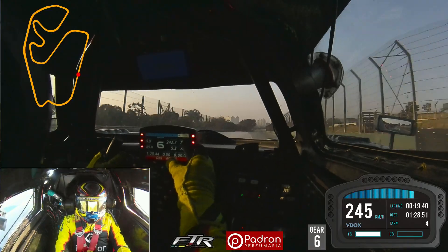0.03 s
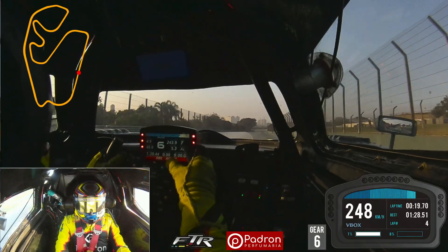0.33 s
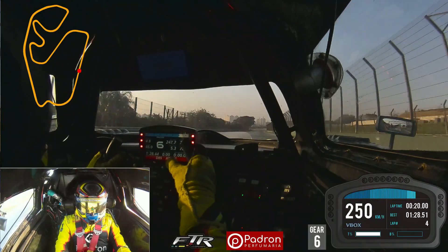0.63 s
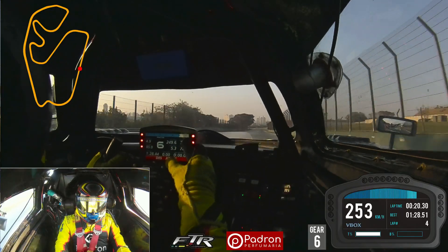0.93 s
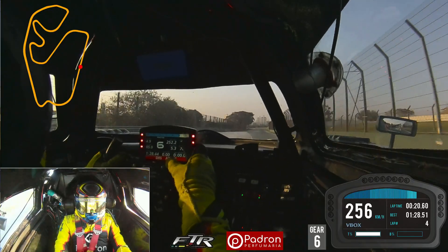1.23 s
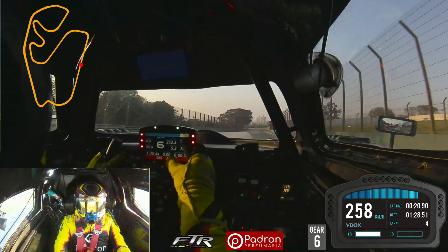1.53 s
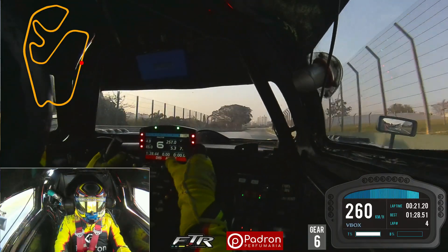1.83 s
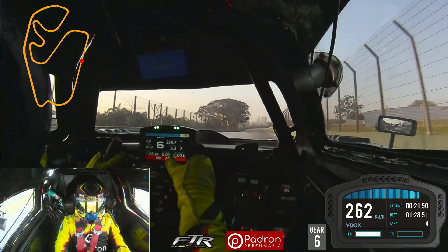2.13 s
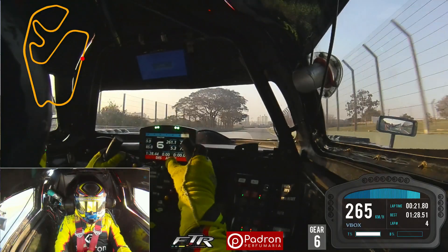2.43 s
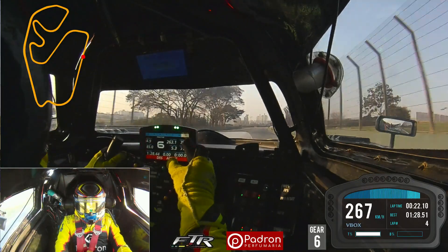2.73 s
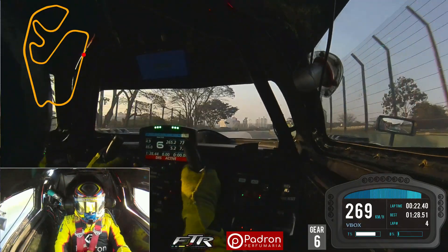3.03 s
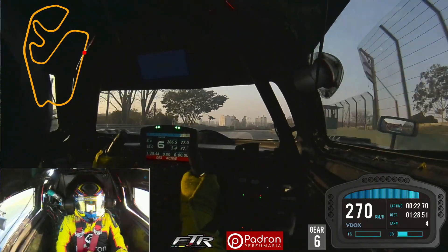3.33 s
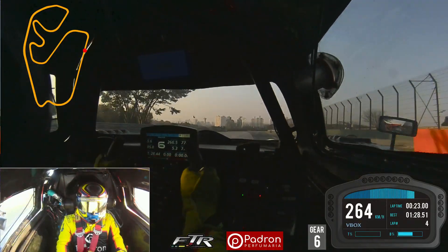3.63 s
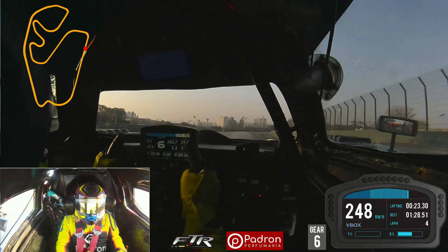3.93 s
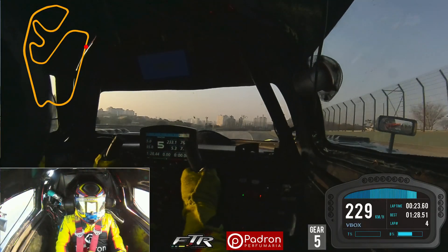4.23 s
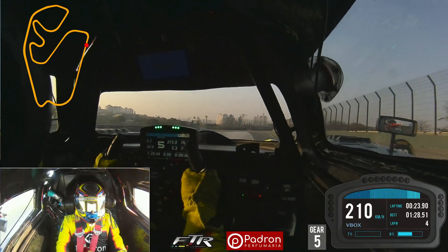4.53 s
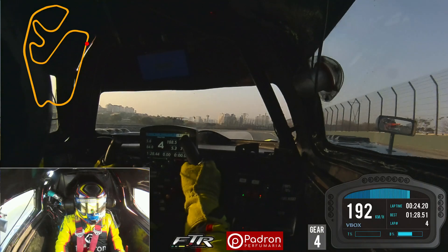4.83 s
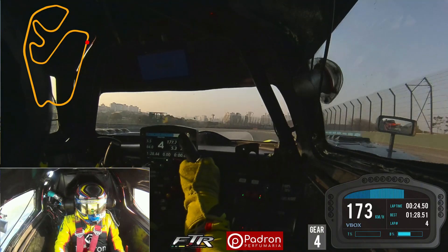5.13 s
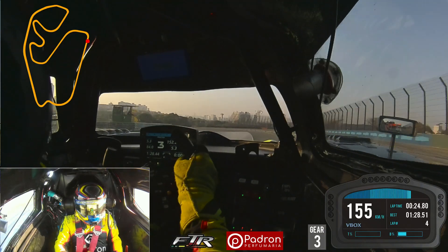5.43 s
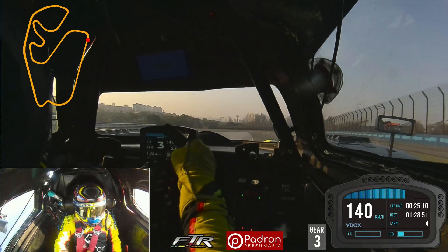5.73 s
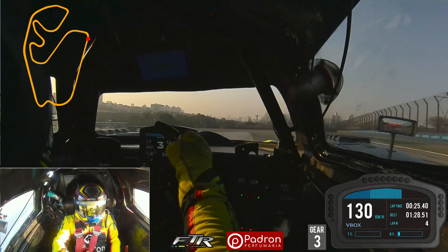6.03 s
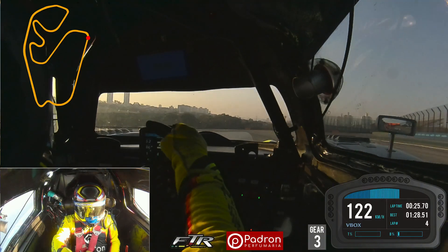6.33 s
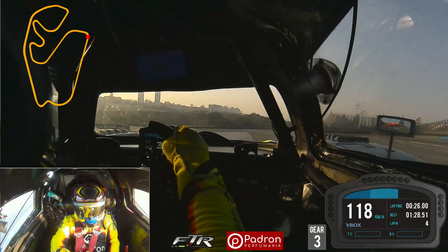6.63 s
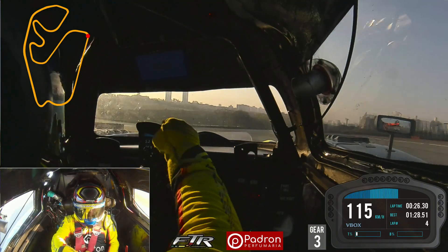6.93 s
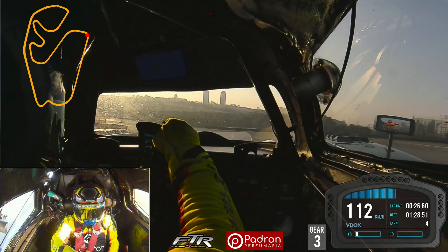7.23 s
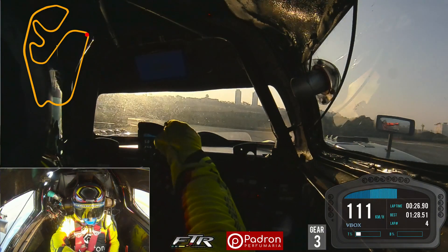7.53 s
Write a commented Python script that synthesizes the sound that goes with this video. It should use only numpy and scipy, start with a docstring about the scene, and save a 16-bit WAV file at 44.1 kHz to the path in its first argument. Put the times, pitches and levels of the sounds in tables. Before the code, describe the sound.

A race car's V8 engine booms and rasps at full throttle, its pitch creeping upward over road rumble, hiss and small rattles. About three seconds in, the throttle lifts and the brakes give a brief, wavering groan. The revs fall through three downshifts, each with a sharp blip, then the engine burbles low with a faint whine and swells once more at the end. It is all heard close, inside the bare cockpit.

```python
"""Inside the bare cockpit of a V8 race car: flat out in top gear, hard on the brakes with three blipped
downshifts, then a long burbling overrun into the corner and one last swell. Exhaust orders boom, their
overtones sweep through cabin resonances, and gas turbulence rasps and hisses with the firings, over road
rumble and small rattles. A groan joins the hardest braking, two high engine orders whine on the
overrun, and grit ticks once."""
import sys
import numpy as np
from scipy import signal
from scipy.fft import rfft, irfft
from scipy.io import wavfile
from scipy.ndimage import uniform_filter1d, minimum_filter1d

SR = 44100
rng = np.random.default_rng(int(sys.argv[2]) if len(sys.argv) > 2 else 0)


def materialize(psi):
    """Save the field psi as 16-bit PCM at rate SR to the path in sys.argv[1].

    A 1-D psi becomes a single channel; in a 2-D psi each row is a channel.
    """
    bounded = np.clip(np.atleast_2d(psi).T, -1, 1)
    quanta = np.round(bounded * 32767).astype(np.int16)
    wavfile.write(sys.argv[1], SR, quanta)


N = 334278
T = np.arange(N) / SR
HZ = np.fft.rfftfreq(N, 1 / SR)
BLIP_RISE_S, BLIP_FALL_S = 0.05, 0.05
BOOM_ORDERS = 18


def amp(db):
    """Decibels to gain."""
    return 10 ** (np.asarray(db) / 20)


def unit_rms(x):
    """Scales to rms 1."""
    return x / np.sqrt(np.mean(x ** 2) + 1e-20)


def curves(rows):
    """One automation curve for each column after the time."""
    times, *columns = np.transpose(rows)
    return [np.interp(T, times, column) for column in columns]


def swell(start, rise, hold, fall):
    """A linear attack, hold and release, 0 to 1 and back; times in seconds."""
    return np.clip(np.minimum((T - start) / rise, 1 - (T - start - rise - hold) / fall), 0, 1)


def wander(rate_hz):
    """A random drift of rms 1 that turns about rate_hz times a second."""
    knots = rng.standard_normal(4096)
    return unit_rms(np.interp(T * rate_hz, np.arange(len(knots)), knots))


def eq_curve(points):
    """An EQ curve in dB, drawn through points on a log-frequency axis."""
    hz, db = np.transpose(points)
    return np.interp(np.log(HZ + 1), np.log(hz + 1), db)


def bells(resonances):
    """An EQ curve in dB with one bell for each resonance."""
    return sum(db / (1 + (2 * (HZ - hz) / width) ** 2) for hz, width, db in resonances)


def coloured(x, points, extra_db=0):
    """Applies an EQ of (Hz, dB) points, then scales to rms 1."""
    return unit_rms(irfft(rfft(x) * amp(eq_curve(points) + extra_db), N))


# Road speed. Each row: time in seconds, four-stroke cycles a second that it would give in top gear.
ROAD_SPEED = [(0.0, 48.23), (0.9, 50.02), (1.3, 50.39), (1.65, 50.9), (2.4, 51.96), (3.1, 52.83),
              (3.5, 50.38), (3.8, 47.06), (4.22, 43.77), (4.8, 36.98), (5.2, 32.83), (5.77, 27.68),
              (6.12, 26.11), (6.55, 24.91), (6.96, 24.28), (7.04, 24.69), (7.3, 24.02), (7.58, 24.05)]
# Blipped downshifts. Each row: start in seconds, hold in seconds, peak cycles a second,
# the new gear's ratio to top gear, then the lift of boom, rasp and hiss in dB.
DOWNSHIFTS = [(4.034, 0.03, 52.93, 1.13, 6, 5, 1.5), (4.48, 0.0948, 52.68, 1.28, 5, 9.5, 6.5),
              (5.205, 0.0603, 50.85, 1.5, 6.5, 11, 4.5)]
def engine_speed():
    """Engine cycles a second: road speed times the gear, the revs flaring as each lower gear goes in."""
    gear = np.ones(N)
    for start, hold, _, ratio, *_ in DOWNSHIFTS:
        gear[T > start + BLIP_RISE_S + hold / 2] = ratio
    hz = curves(ROAD_SPEED)[0] * gear
    for start, hold, peak_hz, *_ in DOWNSHIFTS:
        hz += (peak_hz - hz) * swell(start, BLIP_RISE_S + hold / 2, hold / 2, BLIP_FALL_S)
    return hz


# How hard the car works. Each row: time in seconds, then the boom, rasp and hiss faders in dB.
EFFORT = [(0.0, -13.5, -21.5, -35.5), (1.2, -15.5, -23.5, -35.5), (1.6, -14, -24.5, -35),
          (3.0, -16, -23.5, -35.3), (3.33, -14.5, -23.5, -34.3), (3.45, -13, -21, -32),
          (4.0, -19.5, -24, -36.5), (4.2, -17.5, -27.5, -39), (4.38, -16.5, -28, -41.5),
          (4.8, -16, -28.5, -41), (5.17, -16.5, -31.5, -41), (5.42, -19.5, -32.3, -45.5),
          (5.63, -20, -35, -45.5), (6.35, -15.5, -30.5, -45), (7.05, -15, -30.5, -45.5),
          (7.32, -17.8, -33.5, -45.5)]
# Brief swells. Each row: start, hold and fall in seconds, then the lift of boom, rasp and hiss in dB.
SURGES = [(1.24, 0.03, 0.47, 2, 2.5, 4), (3.08, 0.02, 0.093, 3, 4.5, 5), (5.684, 0.038, 0.54, 6, 9, 6.5),
          (5.98, 0.24, 0.07, 1, 1.5, 2), (6.624, 0.034, 0.21, 2, 1.5, 2), (7.375, 0.15, 0.1, 5, 3, 1)]
def effort(surge_rise_s=0.041):
    """The boom, rasp and hiss faders in dB: a slow ride, pushed up by each blip and surge."""
    faders_db = np.array(curves(EFFORT))
    for start, hold, _, _, *lift_db in DOWNSHIFTS:
        faders_db += np.outer(lift_db, swell(start, BLIP_RISE_S, hold, BLIP_FALL_S))
    for start, hold, fall, *lift_db in SURGES:
        faders_db += np.outer(lift_db, swell(start, surge_rise_s, hold, fall))
    return faders_db


# The cue sheet. Each row: start in seconds, order balance, trims in dB for exhaust, rumble,
# overtones and rasp, throttle from 0 to 1, stumble from 0 to 1.
CUES = [ (0, "pull", -0.6, -6.5, -1.8, -5.5, 1, 0.07), (1.27, "surge", 0.6, -6.5, -2.5, -4, 1, 0.21),
        (2.08, "top", 0.5, -5.5, -2.5, -4.5, 1, 0.06), (3.1, "top", -1.5, -4, -11, 0, 0.57, 0.46),
        (3.28, "brake", -2.5, -3.5, -8.5, -0.4, 0.5, 0.33), (4.1, "drag", -2, -4.3, -4.5, 0, 0.2, 0.24),
        (4.98, "overrun", -1.5, -4.5, -6.5, 3, 0.05, 0.23), (5.3, "overrun", -3, -2.5, -7, 2.2, 0.02, 0.43),
        (5.7, "overrun", -1, -6.5, -9, -0.8, 0.1, 0.14), (6.42, "coast", -0.2, -7.5, -10, 0.2, 0.07, 0.13),
        (6.99, "feather", -0.5, -8.5, -7, 3, 0, 0.15), ]
# The cue during a blip: the same columns without the start.
BLIP_CUE = ("blip", -0.8, -6.5, -7.5, -1.84, 0.2, 0.14)
def follow_cues(values, blip_value, glide_s=0.028):
    """Glides from one cue's value to the next, crossfading to blip_value during each blip."""
    starts = np.searchsorted(T, [cue[0] for cue in CUES[1:]])
    steps = np.repeat(np.asarray(values, float), np.diff([0, *starts, N]))
    blip = sum(swell(start, BLIP_RISE_S, hold, BLIP_FALL_S) for start, hold, *_ in DOWNSHIFTS)
    return (1 - blip) * uniform_filter1d(steps, int(glide_s * SR)) + blip * blip_value


# Engine-order balance heard in the cabin. Each row: a label, then cycle orders 1 to 18 in relative dB.
# The first three are one flat-out run, the cabin favouring different orders as the revs climb.
ORDER_BALANCES = { "pull": [-54, -19.5, -23.5, -35, -34, -24.5, -38, -23, -41, -54, -36, -42, -37.5, -35.5,
                  -53, -36, -61, -38.5], "surge": [-46, -18, -21.5, -39, -23.5, -24.5, -59, -22.5, -35.5,
                  -40, -33.5, -46, -32, -32.5, -38, -56, -37, -40], "top": [-35, -18.5, -24.5, -35, -22,
                  -26, -35, -23.5, -34.5, -35.5, -33.5, -40, -36.5, -32.5, -38, -41, -35.5, -54], "brake":
                  [-52, -27.5, -24, -30.5, -33, -33, -47, -30.5, -40.5, -54, -55, -41, -48, -60, -52, -45,
                  -67, -42], "drag": [-42, -21, -24, -31.5, -29.5, -31, -42, -34.5, -36, -48, -48, -41,
                  -42.5, -50.5, -50, -42, -50, -46], "blip": [-37, -16, -46, -39, -25, -26, -37, -21, -53,
                  -30.5, -28, -51, -43, -32.5, -44, -43, -49, -32.5], "overrun": [-35, -24, -19, -21.5, -31,
                  -20, -30, -29, -31, -41, -31.5, -47, -39, -38.5, -44, -55, -42, -45], "coast": [-46, -21,
                  -22.5, -24.5, -28, -22, -32, -28, -36, -48, -34, -60, -57, -42.5, -39, -62, -52, -51],
                  "feather": [-44, -22, -28.5, -29.5, -25.5, -34, -55, -19.5, -38, -42, -35.5, -34, -42,
                  -46, -41, -53, -59, -49], }
def exhaust(cycles, stumble):
    """The boom of an uneven firing pattern, eight firings a cycle; each low order stumbles on its own."""
    shares = {label: amp(db) / np.linalg.norm(amp(db)) for label, db in ORDER_BALANCES.items()}
    boom = np.zeros(N)
    for k in range(BOOM_ORDERS):
        level = follow_cues([shares[cue[1]][k] for cue in CUES], shares[BLIP_CUE[0]][k])
        smear = 0.05 * k * rng.standard_normal()  # the pipe scatters the higher orders' phases
        phase = 2 * np.pi * ((k + 1) * cycles + smear)
        tone = (1 + stumble * wander(30)) * np.cos(phase)
        burble = stumble * wander(30) * np.sin(phase)
        boom += level * (tone + burble)
    return boom * np.sqrt(2 / (1 + 2 * stumble ** 2))


# Narrow cabin resonances. Each row: centre in Hz, width in Hz, boost in dB.
CABIN_RESONANCES = [(1019, 73, 10), (1100, 33, 8), (1187, 33, 9.5), (1315, 84, 12.5), (1450, 29, 11),
                    (1508, 23, 10.5), (1594, 60, 12.5), (1674, 20, 11), (1763, 38, 12), (1946, 36, 9),
                    (2043, 50, 8), (2240, 37, 9), (2390, 37, 9), (2670, 45, 12), (2910, 59, 11)]
def overtones(cycles, count=84, size=4096):
    """High engine orders that swell and fade as they sweep through the cabin's resonances."""
    above_boom = np.arange(count) > BOOM_ORDERS
    wavetable = irfft(np.exp(2j * np.pi * rng.random(count)) * above_boom, size)
    jitter = 0.0007 * wander(60)
    buzz = np.interp((cycles + jitter) % 1, np.arange(size) / size, wavetable)
    tilt = [(700, 19), (950, 0.5), (1300, -3), (1700, -5.5), (2100, -5.5), (2900, -12.5),
            (3600, -16.5), (4400, -29)]
    return coloured(buzz, tilt, bells(CABIN_RESONANCES))


# Thin panels that ring with the hiss and rattles. Each row: centre in Hz, width in Hz, boost in dB.
PANELS = [(2950, 230, 3.5), (5600, 300, 0.5), (6600, 86, -0.5), (8900, 600, 2)]
def shell_ring(ripple_db=2.0, spacing_hz=55, count=2048):
    """The bare shell as an EQ curve in dB: panel peaks over a ripple of dense small resonances."""
    ripple = np.interp(HZ / spacing_hz, np.arange(count), rng.standard_normal(count))
    return bells(PANELS) + ripple_db * ripple


# Midrange rasp and high hiss, throttle open and shut. Each row: frequency in Hz, EQ gain in dB.
RASP_OPEN = [(300, -35), (480, 2.5), (700, 1), (880, -0.5), (1050, 3), (1210, -2.5), (1350, 3.5),
             (1650, -0.5), (1950, -3), (2300, -10), (2600, -10.5), (3200, -30)]
RASP_SHUT = [(300, 8), (450, 0.5), (600, 4.5), (800, -1.5), (900, -3), (1050, 1), (1200, -11.5),
             (1400, -1.5), (1650, -8.5), (1950, -10), (2500, -23), (3200, -44)]
HISS_OPEN = [(1400, -37), (2400, -9.5), (2700, -2), (2950, -4), (3250, -5), (3800, -5.5), (5000, -11),
             (6100, -13), (8000, -19), (9000, -19), (12000, -24), (14000, -31), (15700, -36)]
HISS_SHUT = [(1400, -18), (2400, -1.5), (2800, -2), (3400, -0.5), (3900, -2.5), (4800, -8.5), (5700, -7.5),
             (6700, -10), (7800, -16), (9000, -14.5), (11000, -18.5), (13500, -39), (15700, -29)]
def turbulence(cycles, throttle, open_eq, shut_eq, pulsing, extra_db=0):
    """Gas noise that puffs with the firings; the throttle crossfades between its two colours."""
    beat = sum(depth * np.cos(2 * np.pi * (order * cycles + rng.random()))
               for order, depth in enumerate([0.11, 0.78, 0.78, 0.85], 1))
    puffs = np.exp(pulsing * beat) * rng.standard_normal(N)
    on_throttle = throttle * coloured(puffs, open_eq, extra_db)
    off_throttle = (1 - throttle) * coloured(puffs, shut_eq, extra_db)
    return unit_rms(on_throttle + off_throttle)


# Rumble at speed and when slow. Each row: frequency in Hz, EQ gain in dB.
RUMBLE_FAST = [(12, -16), (25, 1), (45, 1.5), (80, 0), (120, -4.5), (180, 1), (240, -6), (320, -6),
               (420, -11), (520, -13), (800, -50)]
RUMBLE_SLOW = [(12, -8), (25, -1.5), (45, 3), (80, 4), (120, -3), (180, -6.5), (240, -7.5), (320, -8.5),
               (420, -9), (520, -17.5), (800, -47)]
# The crossfade between them. Each row: time in seconds, share of the slow rumble from 0 to 1.
SLOWING = [(3.7, 0), (4.6, 0.94)]
def road_rumble():
    """Road and wind shake the shell, deeper as the car slows."""
    slow = curves(SLOWING)[0]
    shake = rng.standard_normal(N)
    return (1 - slow) * coloured(shake, RUMBLE_FAST) + slow * coloured(shake, RUMBLE_SLOW)


def rattles(shell_db, per_s=90, spread_db=7.0, decay_s=0.0028):
    """Grit and loose fittings hit the shell at random, each a tiny burst of bright noise."""
    hits = rng.random(N) < per_s / SR
    strength = amp(spread_db * np.minimum(rng.exponential(1, N), 2))
    envelope = signal.lfilter([1], [1, -np.exp(-1 / (decay_s * SR))], hits * strength)
    bright = [(1200, -25), (2500, 6), (5000, -1), (9000, -2), (13000, -10), (16000, -18)]
    return coloured(envelope * rng.standard_normal(N), bright, shell_db)


# The groan's pitch line. Each row: time in seconds, unsounded fundamental in Hz.
GROAN_PITCH = [(3.4, 142.7), (3.66, 157.5), (3.77, 152.3), (3.83, 158), (3.94, 151), (4.12, 150.5),
               (4.4, 141)]
# Its chord. Each row: harmonic number, relative level in dB.
GROAN_PARTIALS = [(3, -9), (4, -0.5), (5, -8.5), (6, -7), (7, -7.5), (9, -11)]
def braking_groan(waver=0.01091, gain_db=-28.5):
    """A rough, wavering chord while the brakes bite hardest."""
    hz = curves(GROAN_PITCH)[0] * (1 + waver * wander(90))
    phase = 2 * np.pi * np.cumsum(hz) / SR
    chord = np.zeros(N)
    for harmonic, db in GROAN_PARTIALS:
        judder = 1 + 0.3 * wander(140)
        chord += amp(db) * judder * np.sin(harmonic * phase + 2 * np.pi * rng.random())
    return amp(gain_db) * swell(start=3.384, rise=0.22, hold=0.52, fall=0.29) * np.sqrt(2) * chord


# Two engine orders that sing out. Each row: cycle order, start and end in seconds, level in dB.
HIGH_ORDER_WHINES = [(38, 5.656, 6.61, -42.5), (42, 6.415, 7.3, -49)]
def high_order_whine(cycles, flutter=0.44):
    """A thin, fluttering whine on the overrun, as high engine orders pass a resonance near 1.5 kHz."""
    whine = np.zeros(N)
    for order, start, end, db in HIGH_ORDER_WHINES:
        arch = np.sqrt(np.sin(np.pi * np.clip((T - start) / (end - start), 0, 1)))
        tone = np.sqrt(2) * np.sin(2 * np.pi * order * cycles)
        whine += amp(db) * arch * (1 + flutter * wander(30)) * tone
    return whine


# The tick's bright colour. Each row: frequency in Hz, EQ gain in dB.
TICK_EQ = [(1500, -20), (3000, 3), (5000, -10), (6800, 2), (8000, -9), (10000, -2), (11300, -4), (12800, 6),
           (15000, -12.5)]
def grit_tick(start_s=7.519, level_db=-24, t60_s=0.036):
    """One sharp tick, as of grit on the body: a noise burst that dies at once."""
    envelope = (T >= start_s) * amp(level_db - 60 * np.maximum(T - start_s, 0) / t60_s)
    return envelope * coloured(rng.standard_normal(N), TICK_EQ)


def scene():
    """The mono cockpit mix: revs set the pitch, the faders and the cues set the balance."""
    cycles = np.cumsum(engine_speed()) / SR
    boom_db, rasp_db, hiss_db = effort()
    cue_columns = list(zip(*CUES))[2:]
    automation = map(follow_cues, cue_columns, BLIP_CUE[1:])
    exhaust_trim, rumble_trim, overtone_trim, rasp_trim, throttle, stumble = automation
    shell_db = shell_ring()
    boom = amp(boom_db + exhaust_trim) * exhaust(cycles, stumble)
    buzz = amp(rasp_db + overtone_trim) * overtones(cycles)
    rasp = turbulence(cycles, throttle, RASP_OPEN, RASP_SHUT, pulsing=0.17)
    hiss = turbulence(cycles, throttle, HISS_OPEN, HISS_SHUT, pulsing=0.14, extra_db=shell_db)
    gas = amp(rasp_db + rasp_trim - 0.2) * rasp + amp(hiss_db - 1) * hiss
    road = amp(boom_db + rumble_trim) * road_rumble()
    grit = amp(hiss_db - 15.5) * rattles(shell_db) + grit_tick()
    return (boom + buzz + gas + road + grit + braking_groan() + high_order_whine(cycles))[None]


def record(dry, ceiling=0.61, hold_s=0.006, cutoff_hz=15740):
    """A fast limiter holds the peaks down; the top end dulls, then cuts off steeply."""
    span = int(hold_s * SR)
    gain = minimum_filter1d(np.minimum(1, ceiling / (abs(dry[0]) + 1e-9)), span)
    limited = dry * uniform_filter1d(gain, span)
    top_db = eq_curve([(13800, 0), (cutoff_hz, -4), (cutoff_hz + 100, -100)])
    return irfft(rfft(limited) * amp(top_db), N)


dry = scene()
out = record(dry)
materialize(out)
```